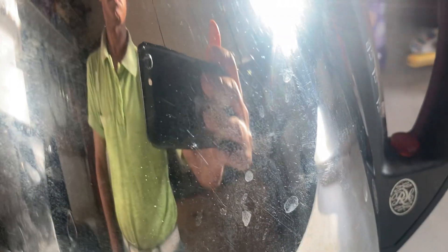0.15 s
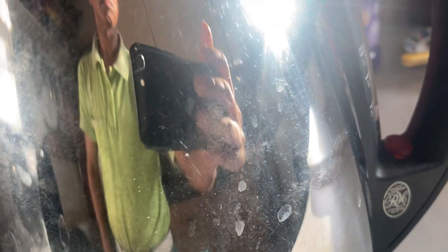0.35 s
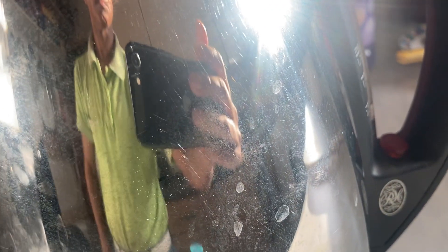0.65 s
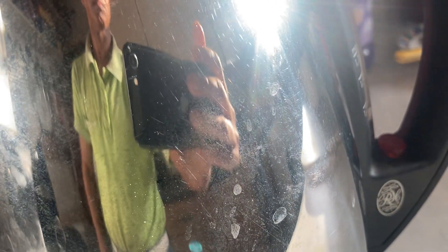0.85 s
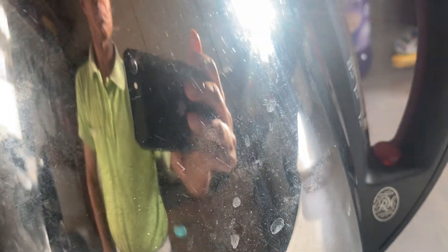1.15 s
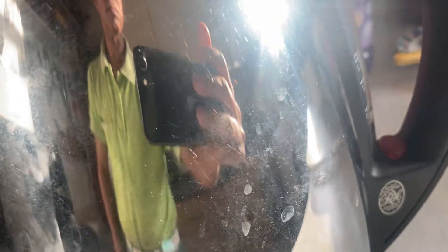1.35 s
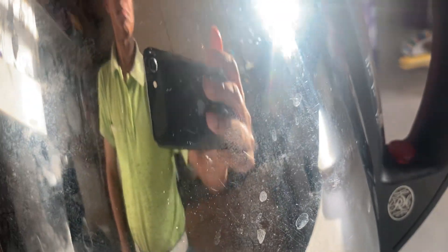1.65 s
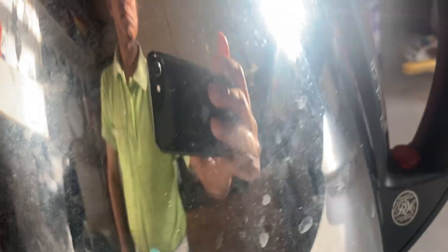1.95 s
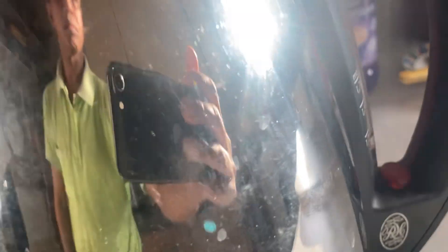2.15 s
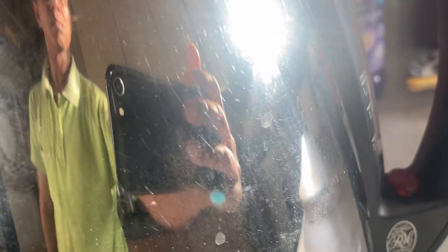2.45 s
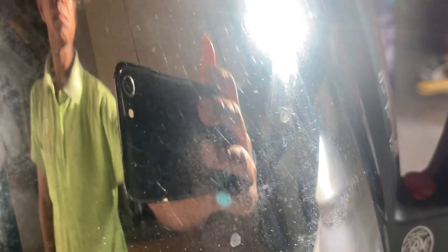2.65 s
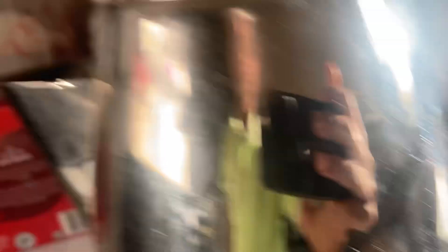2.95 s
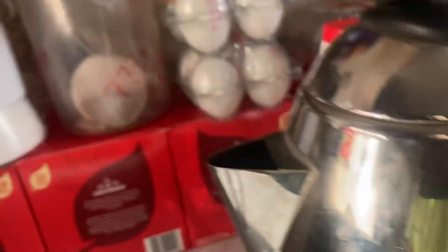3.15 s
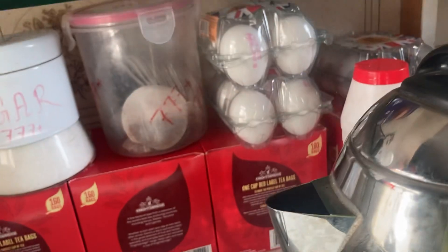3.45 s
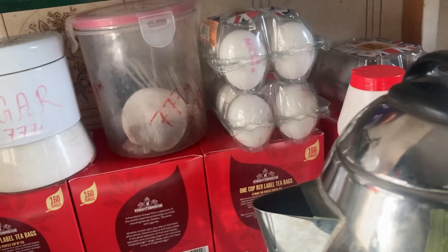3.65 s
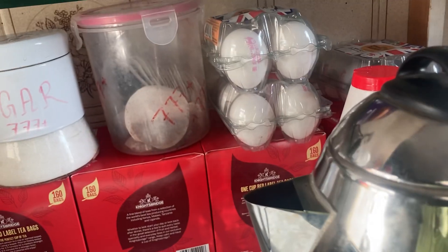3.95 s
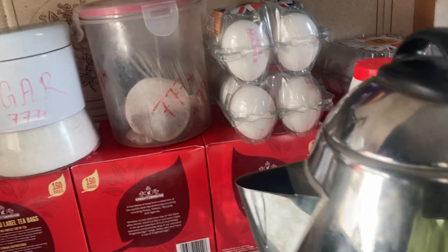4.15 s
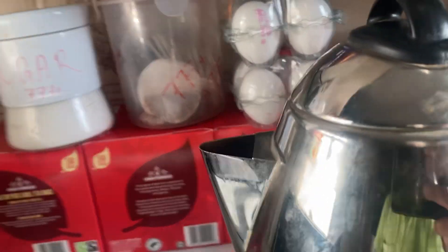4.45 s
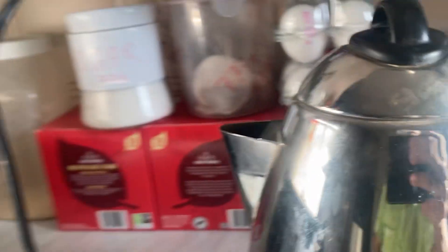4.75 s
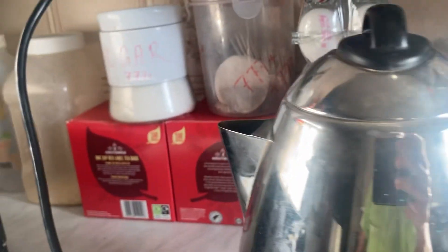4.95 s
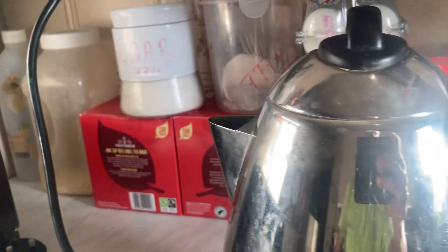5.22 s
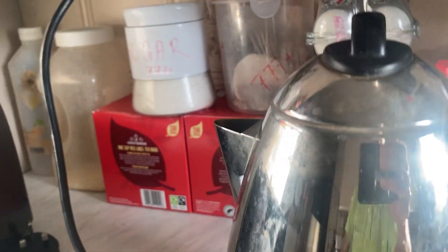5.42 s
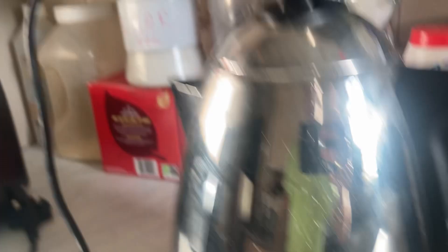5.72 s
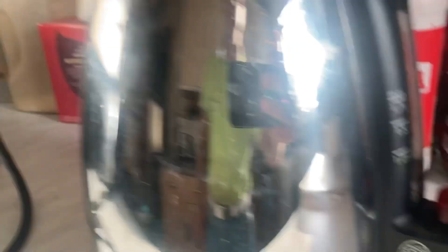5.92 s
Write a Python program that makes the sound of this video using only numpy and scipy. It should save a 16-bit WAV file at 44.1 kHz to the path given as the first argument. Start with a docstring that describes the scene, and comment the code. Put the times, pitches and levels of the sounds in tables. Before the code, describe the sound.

Deep thumping rumble and lively fizz of a steel kettle at a rolling boil, then a sharp switch clack and fading bubbling.

```python
"""Deep thumps and a lively fizz: a steel electric kettle at a rolling boil on a kitchen counter. A phone close
to its side picks it up. Random knocks, filtered by water and body, make the rumble; gliding tones make the
bubbles, and filtered noise makes the fizz, steam and spitting drops. Late on, the boil begins to die down, and
just after, the thermostat trips with a clack: bursts of noise and fading tones of lever and steel."""
import sys
import numpy as np
from scipy import signal
from scipy.fft import rfft, irfft
from scipy.io import wavfile
from scipy.ndimage import uniform_filter1d

SR = 44100
rng = np.random.default_rng(int(sys.argv[2]) if len(sys.argv) > 2 else 0)


def write(x):
    x = np.atleast_2d(x).T
    wavfile.write(sys.argv[1], SR, np.round(np.clip(x, -1, 1) * 32767).astype(np.int16))


N = 268128  # length in samples, about 6 s
T = np.arange(N) / SR
FREQS = np.fft.rfftfreq(2 * N, 1 / SR)

# Moment when the boil begins to die down, just before the thermostat trips.
DIE_DOWN_S = 5.38

# The loudest drops spat against the wall and lid.
# Each row: start in seconds, splash level in dB, sharp tick level in dB.
SPITS = [(0.156, -40, -48), (.222, -47, -57), (.358, -47, -36), (0.367, -34.5, -30.5), (.541, -37, -37),
         (.558, -42, -36), (.77, -37, -42), (1.007, -39.5, -34), (1.285, -56, -33.5), (1.374, -35.5, -33),
         (1.554, -33.5, -48), (1.584, -40, -36), (1.6763, -48, -28), (1.716, -38, -37), (1.788, -38, -37),
         (1.818, -35, -32), (1.873, -42, -32.5), (1.998, -30.5, -33), (2.214, -43, -36), (2.251, -39, -33),
         (2.259, -45, -46), (2.3, -43, -36), (2.332, -38, -34.5), (2.47, -57, -42), (2.72, -43, -37),
         (2.889, -35.5, -45), (2.928, -37.5, -41), (3.053, -35, -33), (3.1138, -37, -27), (3.117, -42, -32),
         (3.2862, -42, -26), (3.34, -40, -28), (3.383, -38, -46), (3.434, -43, -53), (3.57, -34, -36),
         (3.7385, -39, -27), (4.006, -35, -28), (4.296, -33.5, -34), (4.409, -41, -31.5), (4.637, -44, -44),
         (4.846, -35.5, -41), (4.859, -50, -32.5), (4.864, -54, -37), (5.061, -36.5, -34.5),
         (5.156, -50, -41), (5.168, -36.5, -44), (5.298, -40, -35.5), (5.352, -37, -44), (5.594, -44, -36),
         (5.64, -34, -34), (5.675, -45, -52), (5.77, -51, -37), (5.843, -52, -56), (5.911, -40, -45)]
# Ringing tones of the steel shell. Each row: pitch in Hz, relative level in dB, time to fade by 60 dB in s.
SHELL = [(1147, -3, 0.19), (1334, -2, 0.28), (1440, 11.5, 0.18), (1840, 10.5, 0.13), (2150, 7, 0.18),
         (2580, 9, 0.21), (2990, 9, 0.16), (3340, 9, 0.15), (3790, 2, .22), (4200, -3, 0.27),
         (4390, 0, .18), (4495, 1, 0.23), (4520, 8, 0.29), (4690, 5, .18), (4800, -2, .22), (7100, -6, .18),
         (7800, -8, 0.18), (9200, -4, .17), (10200, -2, 0.22), (11350, -3, 0.25), (11940, -3, .15),
         (12700, 6, .14), (12800, -7, .18)]
# The water heaves up. Each row: centre in seconds, half length in seconds, rise in dB.
HEAVES = [(3.12, 0.32, 1), (4.66, 0.17, 2)]
# Clusters of steam bubbles collapse together. Each row: centre in s, half length in s, rise in dB.
SURGES = [(.12, .03, 0), (0.286, .05, 1.5), (0.397, 0.016, 4.5), (0.656, 0.016, 2), (0.793, 0.072, 1),
          (0.983, .06, 1), (1.127, 0.028, 0), (1.295, 0.038, 2), (1.563, 0.062, 2), (1.68, 0.021, 0),
          (1.845, 0.039, 1.5), (1.95, 0.02, 2.5), (2.106, .03, 1.5), (2.363, 0.05, 3), (2.5, 0.05, 0.5),
          (2.734, 0.019, 0), (2.946, 0.096, 1.5), (3.067, 0.035, 2), (3.2, 0.021, 1.5), (3.3, .04, 0),
          (3.56, .03, 0.5), (3.637, 0.031, 2), (3.923, 0.035, 3), (4.06, .025, 1.5), (4.275, 0.081, 1),
          (4.397, 0.013, 3), (4.589, 0.031, 3), (4.757, 0.02, 4), (4.938, 0.015, 5.5), (5.082, 0.031, 3),
          (5.205, 0.021, 3), (5.39, .025, 0.5), (5.654, 0.018, 4), (5.73, 0.022, 4)]
# Lulls between the clusters. Each row: centre in s, half length in s, change in dB (below 0).
LULLS = [(0.356, 0.025, -5), (0.596, .05, -2), (1.42, 0.017, -3.5), (1.64, 0.013, -4.5), (1.741, .02, -3.5),
         (1.913, 0.021, -4.5), (2.165, 0.025, -1.5), (2.282, 0.016, -4), (2.59, .02, -3.5),
         (2.773, 0.016, -3), (3.117, 0.017, -2), (3.402, .04, -2), (3.79, 0.015, -2.5), (3.86, 0.02, -2),
         (4.018, 0.021, -3), (4.375, 0.017, -2), (4.525, 0.023, -7), (4.724, 0.014, -4), (4.903, .025, -2),
         (5.14, 0.027, -4.5), (5.357, 0.019, -2.5), (5.53, 0.028, -3.5), (5.8, 0.027, -2)]


def undb(db):
    """Turn decibels into a gain."""
    return 10 ** (np.asarray(db) / 20)


def unit(x):
    """Scale to an average strength (rms) of 1."""
    return x / np.sqrt(np.mean(x ** 2))


def across(rows, axis=1):
    """Spread one column of a frequency table over every frequency bin."""
    rows = np.array(rows)
    return np.interp(np.log(FREQS + 1), np.log(rows[:, 0]), rows[:, axis])


def colour(x, points):
    """Filter to a shape of (Hz, relative dB) that falls off past both ends; white noise keeps its power."""
    octaves_below = np.maximum(np.log2(points[0][0] / (FREQS + 1)), 0)
    octaves_above = np.maximum(np.log2((FREQS + 1) / points[-1][0]), 0)
    gain = unit(undb(across(points) - 20 * (octaves_below + octaves_above)))
    # folding the cepstrum makes the filter causal: nothing sounds before its cause
    cepstrum = irfft(np.log(gain))
    response = np.exp(rfft(2 * cepstrum[:N], 2 * N) - cepstrum[0])
    return irfft(rfft(x, 2 * N) * response)[:N]


def resonate(x, hz, width_hz):
    """Let one resonance ring, with gain 1 at its centre."""
    return signal.lfilter(*signal.iirpeak(hz, hz / width_hz, fs=SR), x)


def fade(t60):
    """Die away smoothly, by 60 dB in t60 seconds."""
    return np.exp(-np.log(1000) * T[:int(t60 * SR) + 2] / t60)


def burst(t60, rise_s=0):
    """Dying noise, which may take a moment to swell."""
    shape = fade(t60)
    swell = 1 - np.exp(-(T[:len(shape)] + 1 / SR) / (rise_s + 1 / SR))
    return shape * swell * rng.standard_normal(len(shape))


def bubble(hz, t60, swell_s, glide):
    """A bubble swells, rings and rises in pitch as it nears the surface."""
    shape = fade(t60)
    t = T[:len(shape)]
    swell = 1 - np.exp(-t / swell_s)
    cycles = hz * t * (1 + glide * t) + rng.random()
    return shape * swell * np.sin(2 * np.pi * cycles)


def ring(modes, swell_cycles=0.43):
    """Tones (Hz, dB, t60 in s) ring together after one blow; low ones take longer to get going."""
    t = T[:SR // 2]
    out = np.zeros(len(t))
    for hz, db, t60 in modes:
        shape = np.exp(-np.log(1000) * t / t60) * (1 - np.exp(-hz * t / swell_cycles))
        out += undb(db) * shape * np.sin(2 * np.pi * (hz * t + rng.random()))
    return out


def add(track, s, sound):
    """Mix a sound in at time s."""
    start = max(int(s * SR), 0)
    track[start:start + len(sound)] += sound[:max(N - start, 0)]


def walk(rate):
    """Slow random wandering with a spread of 1."""
    k = int(SR / rate)
    steps = np.repeat(rng.standard_normal(N // k + 1), k)
    return unit(uniform_filter1d(steps, k)[:N])


def pops(rate, spread_db):
    """Random clicks, on average rate per second, many small and a few large."""
    sizes = undb(spread_db * np.minimum(rng.exponential(size=N), 4))
    happens = rng.random(N) < rate / SR
    return unit(happens * sizes * rng.choice([-1, 1], N))


def moments(count, until_s):
    """Random times up to a given moment, one in each equal share of that stretch."""
    return until_s * (np.arange(count) + rng.random(count)) / count


def swells(rows):
    """Smooth rises and falls from rows of (centre in s, half length in s, height)."""
    return sum(height * np.exp(-((T - s) / half_s) ** 2) for s, half_s, height in rows)


def cooling(loss_db_per_s=10, quickening_db_per_s2=9.5):
    """Level change in dB once the boil begins to die down, falling ever faster."""
    since = np.maximum(T - DIE_DOWN_S, 0)
    return -loss_db_per_s * since - quickening_db_per_s2 * since ** 2


def surface_level(steady_db=-54.5, heave_share=0.78, cooling_share=0.81):
    """Surface level in dB: steady, higher when the water heaves, and sinking as it cools."""
    return steady_db + heave_share * swells(HEAVES) + cooling_share * cooling()


def thin_note(hz=1800, width_hz=19, level_db=-67, start_s=3.6, fade_s=.1):
    """A faint, unsteady note, noise in a narrow resonance, sings late on and stops as the boil starts to die
    down."""
    tone = unit(resonate(rng.standard_normal(N), hz, width_hz))
    present = np.clip(np.minimum(T - start_s, DIE_DOWN_S - T) / fade_s, 0, 1)
    return tone * undb(level_db) * present


def steam():
    """Each puff leaves the spout as a smooth, bright hiss of filtered noise."""
    # Puffs of steam. Each row: centre in seconds, half length in seconds, level in dB.
    puffs = [(0.55, 0.036, -52), (3.194, 0.3, -80), (4.194, 0.073, -46.5), (5.328, 0.19, -54.5)]
    flow = swells([(s, half_s, undb(db)) for s, half_s, db in puffs])
    bright = [(2000, 5), (4000, 4.5), (5500, 0), (8000, -5), (12000, -4), (15500, -11)]
    return flow * colour(rng.standard_normal(N), bright)


def crackle():
    """Each patch of froth bursts as a quick run of tiny pops."""
    # Patches of froth breaking up. Each row: centre in seconds, half length in seconds, level in dB.
    patches = [(0.192, 0.062, -52), (1.558, 0.064, -52), (1.797, 0.037, -50), (2.92, .03, -51),
               (3.148, .14, -55), (3.608, 0.068, -50), (4.71, .12, -59)]
    flow = swells([(s, half_s, undb(db)) for s, half_s, db in patches])
    tiny = [(1200, -12), (1900, 1.5), (2600, -8), (3300, -4.5), (4800, -18)]
    return flow * colour(pops(rate=400, spread_db=3.0), tiny)


def simmer(start_db=-36, fall_db_per_s=3.5):
    """Smaller, higher bubbles, made of random clicks, grow fainter as the rolling boil takes over."""
    # Colour of the smaller bubbles of the early boil. Each row: frequency in Hz, relative level in dB.
    small_bubbles = [(400, -23.5), (470, 8), (550, 2.5), (600, 1), (680, -1.5), (745, -4), (820, -22.5)]
    return colour(pops(rate=330, spread_db=1.0), small_bubbles) * undb(start_db - fall_db_per_s * T)


def fragments(count=2, scatter_s=0.031, smaller_db=-13):
    """A big drop breaks up and its pieces land just after it: rows like those of SPITS."""
    return [(s + scatter_s * late, wet_db + smaller_db, sharp_db + smaller_db)
            for s, wet_db, sharp_db in SPITS for late in rng.random(count)]


def droplets(count=20, wet_db=-41, sharp_db=-41, spread_db=2):
    """Lesser drops fly at random until the boil begins to die down: rows like those of SPITS."""
    wet, sharp = spread_db * rng.standard_normal((count, 2)).T
    return list(zip(moments(count, DIE_DOWN_S), wet_db + wet, sharp_db + sharp))


def spits(splash_t60=0.042, spray_t60=0.098, spray_db=-15):
    """A drop lands with a sharp tick amid a duller splash and a little spray, all bursts of noise."""
    splash, tick = np.zeros((2, N))
    tick_t60, tick_rise_s = .0075, .0004
    splash_rise_s, spray_rise_s = .003, .008
    for s, wet_db, sharp_db in SPITS + fragments() + droplets():
        add(splash, s - splash_rise_s / 2, undb(wet_db) * burst(splash_t60, splash_rise_s))
        add(tick, s - tick_rise_s / 2, undb(sharp_db) * burst(tick_t60, tick_rise_s))
        add(tick, s - spray_rise_s / 2, undb(sharp_db + spray_db) * burst(spray_t60, spray_rise_s))
    dull = colour(splash, [(1700, 7), (3300, 15.5), (5500, 2.5)])
    sharp = colour(tick, [(3500, -9), (5500, 1.5), (8000, 6.5), (12000, -1.5), (15500, -12)])
    return dull + sharp


def plinks(t60=0.046, swell_s=0.00039, glide=1.0, tone_db=-4.5,
           crackle_db=3.5, crackle_t60=0.059, crackle_rise_s=0.0022, width_hz=800):
    """A small bubble rings for a moment amid the crackle of neighbours of about its size."""
    out = np.zeros(N)
    # The clearest small ringing bubbles.
    # Each row: start in seconds, level in dB before the offsets above, starting pitch in Hz.
    clear_bubbles = [(.222, -38.5, 1890), (1.696, -35, 3250), (1.786, -34, 1930), (1.823, -30, 2050),
                     (1.965, -39, 3170), (2.926, -32, 2180), (3.287, -33, 3040), (3.302, -38, 3060),
                     (3.338, -37, 3070), (3.352, -40, 3080), (3.372, -42, 3050), (3.432, -32, 3200),
                     (3.443, -36, 3030), (3.493, -37.5, 3100), (3.57, -37, 3060), (3.587, -40, 3230),
                     (3.644, -35, 3050), (3.715, -41, 3100), (3.909, -34, 3200), (3.981, -34, 3070),
                     (4.012, -40, 3040), (4.318, -37, 4200), (4.409, -36, 3980), (4.475, -39, 3760),
                     (4.53, -43, 4080), (4.637, -39, 4050), (4.847, -45, 3430), (5.06, -33.5, 3400)]
    for s, db, hz in clear_bubbles:
        add(out, s, undb(db + tone_db) * bubble(hz, t60, swell_s, glide))
        neighbours = resonate(burst(crackle_t60, crackle_rise_s), hz, width_hz)
        add(out, s - crackle_rise_s, undb(db + crackle_db) * neighbours)
    return out


def froth(count=700, centre_hz=2100, octaves=0.584, cycles=45, swell_s=0.0014, glide=1.2,
          gain_db=6, spread_db=7.0, slope_db=-5):
    """Hundreds of small bubbles ring in the froth; smaller ones are higher, shorter and fainter."""
    out, loud_db = np.zeros(N), surface_level()
    starts = rng.integers(N, size=count)
    draws = np.clip(rng.standard_normal((count, 2)), -2, 2)
    for at, (size, chance) in zip(starts, draws):
        hz = centre_hz * 2 ** (octaves * size)
        db = loud_db[at] + gain_db + spread_db * chance + slope_db * octaves * size
        add(out, T[at], undb(db) * bubble(hz, cycles / hz, swell_s, glide))
    return out


def fizz(hiss_db=1, steel_db=-21, gain_db=10.0):
    """Small bubbles burst in brief sprays over smooth steam hiss, and set the steel faintly singing."""
    # Colour of bursting film at the surface. Each row: frequency in Hz, relative level in dB.
    film = [(500, -14.5), (1000, -1.5), (1450, -8), (2000, -9), (2600, -13), (3200, -15), (4200, -20.5),
            (5300, -24.5), (6300, -23), (8500, -25), (11000, -26), (15500, -35.5)]
    spray_t60, spray_rise_s = .018, .003
    # add up the power of overlapping sprays, then let it shape fresh noise
    power = signal.fftconvolve(pops(rate=220, spread_db=3.5) ** 2, burst(spray_t60, spray_rise_s) ** 2)[:N]
    spray = unit(np.sqrt(np.abs(power)) * rng.standard_normal(N))
    surface = unit(spray + undb(hiss_db) * rng.standard_normal(N))
    steel = unit(signal.fftconvolve(surface, ring(SHELL))[:N])
    return colour(surface + undb(steel_db) * steel, film) * undb(surface_level() + gain_db)


def switch(crack_db=-2.0, lever_db=-9, shell_db=-40, room_db=-35.0, room_t60=0.38,
           rattle_db=-23, rattle_t60=0.13):
    """Snaps crack in the plastic handle; the blow on the stop rings lever, base, shell and kitchen."""
    # The latch slips, the lever hits its stop and chatters.
    # Each row: start in seconds, relative level in dB, time to fade by 60 dB in seconds.
    snaps = [(5.4415, -19.5, 0.023), (5.4445, -18, 0.036), (5.448, -19, .02), (5.4504, -9.5, 0.025),
             (5.4523, -17.5, 0.047), (5.4545, -15, 0.038), (5.4581, -29, 0.031), (5.474, -26, .015)]
    # Short-lived tones of the lever and its housing.
    # Each row: pitch in Hz, relative level in dB, time to fade by 60 dB in seconds.
    lever = [(370, -12, 0.1), (510, -12, 0.084), (664, -16, 0.088), (915, -15, 0.081), (1120, -17, 0.058),
             (1290, -12, 0.059), (1440, -17, .05), (1690, -11, 0.047), (1880, -18, .045),
             (2070, -17, 0.045), (2360, -11, 0.039), (2470, -16, .035), (2655, -6.5, 0.05),
             (2750, -15, .035), (3140, -15, 0.04), (3400, -18, .04), (3830, -17, .04), (4380, -17, 0.055),
             (4630, -13.5, 0.051), (4800, -14, 0.045), (7160, -21, .04), (9000, -7, .024), (13600, -9, .03),
             (14100, -8, .03)]
    # Colour of the clack in the handle. Each row: frequency in Hz, relative level in dB.
    handle = [(100, -7), (350, 1), (750, -10.5), (1300, -9), (2200, -3.5), (3800, -9.5), (4700, -4),
              (5600, -13.5), (7500, -11.5), (8300, -12), (9000, -4), (9800, -11), (12500, -6.5),
              (13900, -5.5), (15200, -18)]
    cracks, rings, room = np.zeros((3, N))
    for s, db, t60 in snaps:
        add(cracks, s, undb(db + crack_db) * burst(t60))
    stop_s = max(snaps, key=lambda row: row[1])[0]  # the loudest snap
    add(cracks, stop_s, undb(rattle_db) * burst(rattle_t60))  # the base rattles briefly
    add(rings, stop_s, undb(lever_db) * ring(lever) + undb(shell_db) * ring(SHELL))
    add(room, stop_s, undb(room_db) * burst(room_t60, rise_s=0.0034))
    kitchen = colour(room, [(150, 2), (3000, 5), (7000, 3.0), (15500, -8)])  # a duller answer
    return colour(cracks + kitchen, handle) + rings


def gurgle(surge_share=0.22):
    """Middling bubbles ring the hollow of the kettle, each resonance in its own uneven spurts."""
    # The air above the water and the steel wall gurgle along with the bubbles.
    # Each row: pitch in Hz, width in Hz, relative level in dB.
    hollow = [(379, 30.5, -4), (731, 72, -12.5), (967, 43, -13), (1157, 36, -11.5), (1270, 34, -13.5)]
    rings = np.zeros(N)
    for hz, width_hz, db in hollow:
        rings += undb(db) * unit(resonate(pops(rate=120, spread_db=1.65), hz, width_hz))
    return rings * undb(surge_share * swells(SURGES + LULLS))


def rumble(knock_rate=700, knock_db=1.84, surge_db=.5, churn_db=-4, high_cooling=0.37,
           build_db=1.5, build_s=1.0, ease_db=0.7, hollow_db=-14, deep_db=-27, high_db=-24, merge_db=4):
    """Collapsing steam bubbles knock on churning water and body; deep ones build, higher ones thin out."""
    # Colour of water and body under the bubbles. Each row: frequency in Hz, relative level in dB.
    body = [(26, -34), (42, -13.5), (62, -10), (90, 2), (122, -5.5), (185, 0), (262, -7), (335, -9.5),
            (375, -6.5), (490, -12), (620, -19), (820, -29), (1190, -31.5), (1700, -40)]
    knocking = pops(rate=knock_rate, spread_db=knock_db)
    water = unit(knocking + undb(churn_db) * rng.standard_normal(N))
    water = water * undb(surge_db * walk(15) + swells(HEAVES + SURGES + LULLS))
    knocks = colour(water, body)
    deep = signal.sosfiltfilt(signal.butter(3, 270, fs=SR, output="sos"), knocks)
    high = knocks - deep + undb(hollow_db) * gurgle()
    progress = (T / DIE_DOWN_S) ** 2  # reaches 1 as the boil begins to die down
    deep_level = deep_db - build_db * np.exp(-T / build_s) - ease_db * progress + cooling()
    # the higher bubbles merge into deep ones as the boil rolls on
    high_level = high_db - merge_db * progress + high_cooling * cooling()
    return deep * undb(deep_level) + high * undb(high_level)


def glugs(count=5, t60=0.07, swell_s=0.00434, glide=0.48, octaves=0.045, spread_db=-2.0):
    """Big steam bubbles ring briefly; lesser ones rise between them until the boil begins to die down."""
    # The biggest steam bubbles. Each row: time in seconds, level in dB, starting pitch in Hz.
    big_bubbles = [(.288, -13.5, 382), (.747, -11, 174), (.783, -10, 173), (1.124, -11, 187),
                   (1.45, -18, 187), (1.532, -13, 390), (1.664, -14.5, 379), (1.69, -11.5, 166),
                   (1.832, -15, 436), (1.948, -13, 414), (2.212, -12, 363), (2.318, -16.5, 98),
                   (2.65, -15, 355), (2.724, -15, 376), (2.813, -9, 173), (2.943, -10.5, 168),
                   (3.05, -12, 393), (3.173, -14.5, 383), (3.205, -12, 383), (3.291, -6, 174),
                   (3.344, -8, 149), (3.553, -22, 370), (3.656, -14, 169), (4.054, -8, 178),
                   (4.14, -13.5, 99), (4.258, -11, 205), (4.392, -13, 185), (4.581, -13.5, 167),
                   (4.6, -13, 377), (4.748, -14, 348), (4.991, -26, 189), (5.184, -18.5, 320)]
    # Lesser ones come at random around two pitches of the water.
    # Each row: middle pitch in Hz, middle level in dB.
    lesser = [(175, -21.5), (395, -17.5)]
    out, rows = np.zeros(N), list(big_bubbles)
    for hz, db in lesser:
        for s, (size, chance) in zip(moments(count, DIE_DOWN_S), rng.standard_normal((count, 2))):
            rows.append((s, db + spread_db * chance, hz * 2 ** (octaves * size)))
    for s, db, hz in rows:
        add(out, s - swell_s, undb(db) * bubble(hz, t60, swell_s, glide))
    return out


def boil():
    """Everything the boiling water sends along one path."""
    surface = thin_note() + steam() + crackle() + spits() + plinks() + froth() + fizz()
    return surface + simmer() + rumble() + glugs()


def at_ports(source, ports):
    """Two microphone ports share a sound; the right, turned away, adds scatter from counter and jars."""
    # Phase lead of the left port. Each row: frequency in Hz, lead in radians.
    lead_points = [(0, .6), (220, 1.15), (310, .15), (650, .2), (1000, .6), (1300, -.5), (2000, -1.4),
                   (2900, -4), (4400, -6.5), (5200, -9.4), (9000, -15.7), (13600, -22), (15500, -25.1)]
    left, scatter = source(), source()  # two separate random draws
    share = np.clip(across(ports, axis=2), 0, 1)
    lead = np.interp(FREQS, *np.transpose(lead_points))
    common = share * np.exp(-1j * lead) * rfft(left, 2 * N)
    unrelated = np.sqrt(1 - share ** 2) * rfft(scatter, 2 * N)
    right = irfft((common + unrelated) * undb(across(ports)))[:N]
    return np.array([left, right])


def scene():
    """The boil and the switch reach the phone from different parts of the kettle."""
    # How the two ports hear each source.
    # Each row: frequency in Hz, right minus left in dB, share common to both from 0 to 1.
    boil_ports = [(40, -12, 0.9), (105, -10, 0.62), (203, -7, 1), (270, -11, 0.28), (369, -3, 1),
                  (810, -6, 0.53), (1160, -9.5, 0.4), (2040, -4, 0), (3300, -6.5, 0.37), (5230, -7.5, 0.45),
                  (6750, 0, 1), (15000, 0, 1)]
    switch_ports = [(170, -6, .95), (450, -3, 1), (1200, -14, .8), (1700, -6.5, .5), (2700, -13, .6),
                    (4300, -2.5, .9), (4850, -12, .9), (6000, -1, 1), (15000, 0, 1)]
    return at_ports(boil, boil_ports) + at_ports(switch, switch_ports)


def record(dry):
    """The phone cuts the top: a steep filter removes what lies above 15800 Hz."""
    return signal.sosfilt(signal.ellip(10, .2, 80, 15800, fs=SR, output="sos"), dry)


dry = scene()
out = record(dry)
write(out)
```